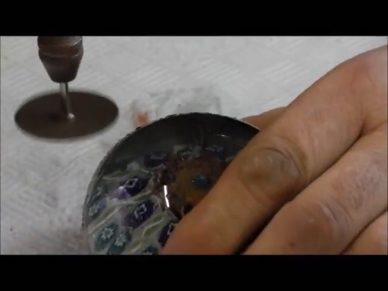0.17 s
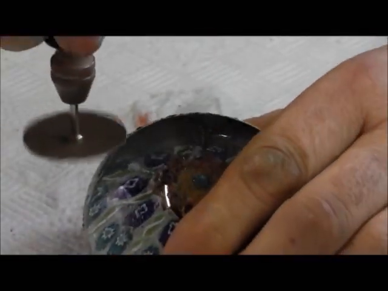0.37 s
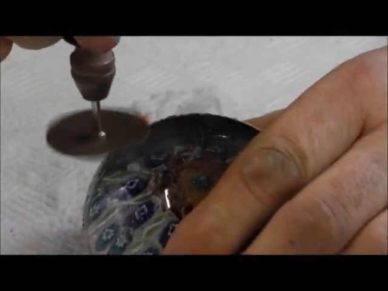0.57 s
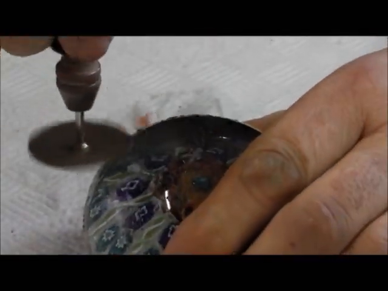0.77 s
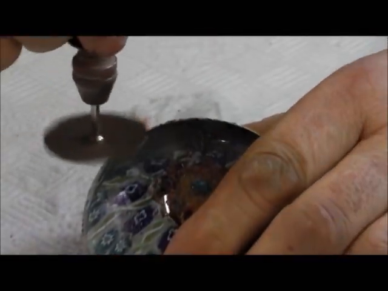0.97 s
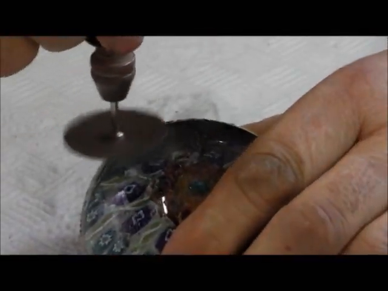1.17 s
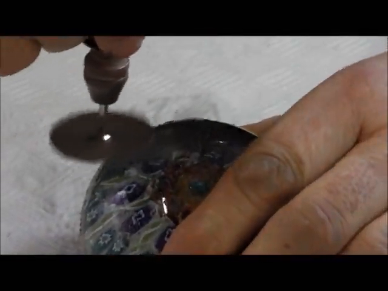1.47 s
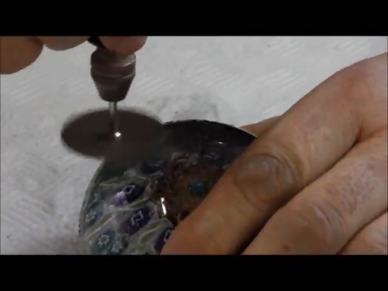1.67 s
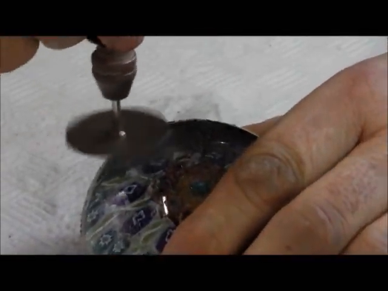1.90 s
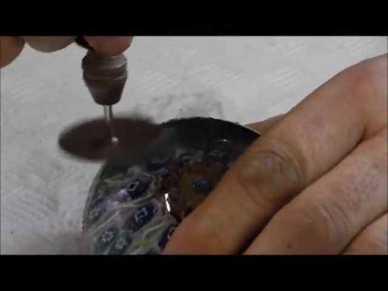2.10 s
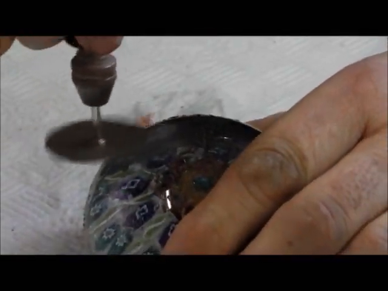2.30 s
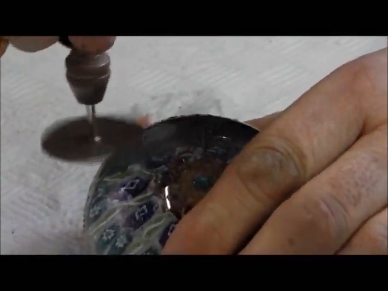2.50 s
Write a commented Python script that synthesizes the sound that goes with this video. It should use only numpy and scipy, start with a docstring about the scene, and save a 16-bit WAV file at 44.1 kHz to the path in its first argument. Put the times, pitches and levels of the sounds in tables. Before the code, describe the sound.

A small rotary tool grinds wet glass. It spins freely for a moment with a thin whine and hiss, then the disc bites in short, rasping, buzzing strokes as the motor slows. Heard close up in a small room.

```python
"""An abrasive disc, spun by a small rotary tool, grinds a wet, hand-held glass dome in short strokes.
The motor runs free at first, with a thin whine, hiss and mains hum, then slows and growls under load.
The disc's high spot knocks once a turn and rebounds, and grit scrapes in between: these impacts
excite the resonant modes of disc and glass. Wet slurry fizzes off the rim,
and the workbench and a small room add short reflections."""
import sys
import numpy as np
from scipy import signal
from scipy.fft import rfft, irfft, next_fast_len
from scipy.io import wavfile

SR = 44100
rng = np.random.default_rng(int(sys.argv[2]) if len(sys.argv) > 2 else 0)


def file_out(sig):
    """Save sig as 16-bit WAV at sys.argv[1]."""
    # one column per channel
    cols = np.atleast_2d(sig).T
    # limit, then scale
    lim = np.clip(cols, -1, 1)
    pcm = np.round(lim * 32767).astype(np.int16)
    wavfile.write(sys.argv[1], SR, pcm)


N = 116865
T = np.arange(N) / SR
FFT_SIZE = next_fast_len(N + SR // 2)
HZ = np.maximum(np.arange(FFT_SIZE // 2 + 1) * SR / FFT_SIZE, 1)


def from_db(db):
    """Amplitude ratio of a level in decibels."""
    return 10 ** (np.asarray(db) / 20)


def unit_rms(x):
    """Normalisation to rms 1."""
    return x / np.sqrt(np.mean(x ** 2) + 1e-20)


def over_time(rows):
    """Linear interpolation in time."""
    return np.interp(T, *np.transpose(rows))


def over_hz(rows, column=1):
    """Interpolation in log frequency."""
    rows = np.array(rows)
    return np.interp(np.log(HZ), np.log(rows[:, 0]), rows[:, column])


def filtered(x, response):
    """Convolution as a product of spectra."""
    return irfft(rfft(x, FFT_SIZE) * response, FFT_SIZE)[..., :N]


def minimum_phase(db):
    """Causal response of a dB curve, by folding the cepstrum."""
    cepstrum = irfft(np.log(from_db(db)), FFT_SIZE)
    cepstrum[1:FFT_SIZE // 2] *= 2
    cepstrum[FFT_SIZE // 2 + 1:] = 0
    return np.exp(rfft(cepstrum))


def resonance_db(hz, width_hz, boost_db):
    """Lorentzian peak of a damped resonator."""
    return 10 * np.log10(1 + (from_db(boost_db) ** 2 - 1) / (1 + (2 * (HZ - hz) / width_hz) ** 2))


def drift(rate_hz):
    """Slow fluctuation: low-passed noise of rms 1."""
    return unit_rms(filtered(rng.standard_normal(FFT_SIZE), 1 / (1 + (HZ / rate_hz) ** 2)))


def harmonic(order, cycles):
    """Sinusoid at a multiple of a fundamental, in random phase."""
    return np.sin(2 * np.pi * (order * cycles + rng.random()))


def panned(balance):
    """Left and right gains from a level difference at each frequency."""
    return from_db(np.array([[.5], [-.5]]) * over_hz(balance))


# Likeness of left and right: frequency_hz, correlation
CORRELATION = [(60, -0.6), (300, 0.37), (2200, 0.74), (4500, 0.08), (8000, -0.54), (15000, -0.16)]

def stereo_noise(db):
    """Partly coherent noise of rms 1: the ratio of mid to side sets the correlation."""
    alike = np.clip(over_hz(CORRELATION), -.99, .99)
    mid, side = filtered(rng.standard_normal((2, N)), from_db(db) * np.sqrt([1 + alike, 1 - alike]))
    return unit_rms(np.array([mid + side, mid - side]))


# Spindle speed: time_s, turns_per_s
SPEED = [(0, 122), (.04, 125.3), (.425, 124), (.5, 121.5), (.545, 124), (.61, 115.5), (.655, 116.6),
         (.74, 116), (.86, 112.6), (1.02, 106.4), (1.21, 103.3), (1.3, 115), (1.41, 103), (1.52, 112.4),
         (1.67, 106.3), (1.84, 111.5), (1.95, 117.4), (2.07, 111), (2.25, 103.4), (2.35, 114.5),
         (2.49, 114), (2.65, 109.5)]

def spindle_turns():
    """Rotation is the integral of a slightly wobbling speed."""
    return np.cumsum(over_time(SPEED) * (1 + .0008 * drift(15))) / SR


# Motor whine: speed_multiple, level_db
WHINE = [(8, -53), (18, -36), (24, -49), (32, -48), (40, -48.5), (72, -48)]
# Motor hum: mains_multiple, level_db
HUM = [(2, -69), (4, -65.5), (6, -66.5), (8, -57), (10, -52.5)]
# Rush of fan and brushes: frequency_hz, relative_db
HISS = [(25, -0.5), (100, -3), (320, -8.5), (430, -2), (620, -2.5), (1200, -2), (1500, 4.5), (1850, 2.5),
        (2700, 5.5), (3400, 2.5), (4100, 5), (5500, 1.5), (7000, 1), (9200, 3), (11500, -2.5), (15500, -9)]
# Housing resonances: frequency_hz, width_hz, boost_db
HOUSING = [(2230, 72, 3), (9180, 97, -1.5)]
# Motor's stereo balance: frequency_hz, left_over_right_db
MOTOR_BALANCE = [(60, -2.5), (400, 4), (2500, 4), (4200, 5), (7000, 4), (12000, -1)]
MAINS_HZ, HISS_DB = 50.05, -30.5
LOAD_START_S, LOAD_RISE_S, WHINE_LOADED_DB, HISS_LOADED_DB = .443, .045, -5.5, -2

def motor(turns):
    """Harmonics of rotation whine and those of the mains hum; the mains modulates whine and hiss."""
    loaded = np.clip((T - LOAD_START_S) / LOAD_RISE_S, 0, 1)
    mains_phase = 2 * np.pi * MAINS_HZ * T
    whine = sum(from_db(db) * harmonic(order, turns) for order, db in WHINE)
    whine *= from_db(WHINE_LOADED_DB * loaded) * (1 + .24 * np.sin(mains_phase))
    hum = sum(from_db(db) * harmonic(order, MAINS_HZ * T) for order, db in HUM)
    hiss = stereo_noise(over_hz(HISS) + sum(resonance_db(*row) for row in HOUSING))
    hiss *= from_db(HISS_DB + HISS_LOADED_DB * loaded) * (1 + .18 * np.sin(2 * mains_phase))
    return filtered(hiss + np.sqrt(2) * (whine + hum), panned(MOTOR_BALANCE))


# The disc is pressed on: start_s, rise_s, hold_s, level_db
STROKES = [(0.443, .045, 0.022, -22), (0.588, 0.013, 0.017, -24.5), (0.706, 0.036, .15, -21),
           (0.916, 0.019, 0.041, -21.5), (1.044, 0.015, 0.059, -19), (1.122, 0.017, 0.03, -18),
           (1.277, 0.027, .12, -19), (1.528, 0.031, 0.11, -18), (1.801, 0.032, 0.099, -18.5),
           (2.063, 0.017, 0.064, -18), (2.228, 0.038, 0.069, -19.5), (2.462, 0.056, 0.052, -18)]
# Light rubbing between strokes: time_s, level_db
RUB = [(.41, -61), (.45, -20), (.6, -21.5), (.69, -21.5), (1.0, -24), (1.24, -26), (1.5, -24.5),
       (1.72, -24.5), (1.79, -29.5), (2.04, -28), (2.21, -31), (2.4, -27.5), (2.46, -33.5), (2.65, -27.5)]

def contact_force(release_s=.025):
    """Normal force on the glass: strokes rise, hold and decay exponentially over light rubbing."""
    strokes = []
    for start, rise, hold, db in STROKES:
        attack = np.clip((T - start) / rise, 0, 1)
        release = np.exp(-np.maximum(T - start - rise - hold, 0) / release_s)
        strokes.append(from_db(db) * attack * release)
    return np.hypot(np.max(strokes, axis=0), from_db(over_time(RUB)))


def impulses(times, sizes):
    """Ideal impacts, one sample long."""
    return np.bincount(np.clip(times * SR, 0, N).astype(int), sizes, N + 1)[:N]


# The disc bites and bounces on the glass: start_s, length_s, level_db, unevenness_share
BITES = [(0.427, 0.05, -25.5, 0.27), (0.463, 0.079, -19.5, 0.08), (0.547, 0.091, -21, 0),
         (0.743, 0.052, -23.5, 0.62), (0.813, 0.081, -22, 0.21), (1.061, 0.048, -19, .5),
         (1.138, 0.034, -21.5, 0.69), (1.296, 0.067, -19.5, 0.52), (1.397, 0.03, -25.5, 0.68),
         (1.54, 0.035, -20.5, 0.79), (1.617, 0.056, -20, 0.5), (1.827, .11, -22, 0.6),
         (2.068, 0.076, -20, 0.58), (2.313, 0.042, -17.5, 0.02), (2.515, 0.058, -19.5, 0.65)]
KNOCK_DB, KNOCK_JITTER_S, BITE_RELEASE_S = -7, .0003, .012
REBOUND_TURNS, REBOUND_DB, REBOUND_JITTER_S = .48, -5.5, .00099

def knocks(turns, force):
    """Periodic impact: the high spot strikes once a turn and rebounds, harder while the disc bites."""
    turn_numbers = np.arange(1, int(turns[-1]))
    count = len(turn_numbers)
    times = np.interp(turn_numbers, turns, T)
    rebound_times = np.interp(turn_numbers + REBOUND_TURNS, turns, T)
    size = from_db(KNOCK_DB) * np.interp(times, T, force)
    uneven = np.ones(count)
    for start, length, db, unevenness in BITES:
        release = np.exp(-np.maximum(times - start - length, 0) / BITE_RELEASE_S)
        bite = from_db(db) * (times > start) * release
        uneven = np.where(bite > size, unevenness, uneven)
        size = np.maximum(bite, size)
    jitter, scatter_db, rebound_jitter, rebound_scatter_db = uneven * rng.standard_normal((count, 4)).T
    strikes = impulses(times + KNOCK_JITTER_S * jitter, size * from_db(scatter_db))
    rebounds = impulses(rebound_times + REBOUND_JITTER_S * rebound_jitter,
                        size * from_db(REBOUND_DB + rebound_scatter_db))
    return (strikes + rebounds) * np.sqrt(N / count)


def grit(turns, grains_per_s=7000):
    """Shot noise: abrasive grains chip the glass, hardest just after the high spot strikes."""
    grain_db = np.minimum(rng.exponential(1, N), 4)
    sizes = from_db(grain_db) * rng.choice([-1, 1], N)
    hits = rng.random(N) < grains_per_s / SR
    return unit_rms(sizes * hits * np.exp(-.5 * (turns % 1)))


# The contact slides from the dome's edge up its side: time_s, side_share
SLIDE = [(.6, 0.32), (.85, 0.36), (1.08, 0.93)]
# Modes of disc and glass: pitch_hz, width_hz, edge_boost_db, side_boost_db
MODES = [(705, 27, 14, 8), (1372, 18.15, 6.5, 12.5), (1550, 37, -3, 12.5), (1640, 7.3, 18.5, 14),
         (1846, 15, 11, 10.5), (1930, 40, 13, 9.5), (2024, 40, 13.5, -1), (2182, 69, 4.5, 13.5),
         (2303, 39, 8, 5), (2510, 38, 8, 11), (2687, 25, 1, 7), (2788, 47, 8.5, 3), (4058, 56, 0, 9),
         (4143, 93, 5.5, 6), (4398, 75, 9.5, 5), (4564, 105, 13.5, 2.5), (5180, 25, 8, 9)]
# Broad spectrum of the contact: frequency_hz, edge_db, side_db
CONTACT_COLOUR = [(150, -29.5, -44.5), (354, -17, -29.5), (476, -25, -25.5), (1080, -12, -13),
                  (1392, -6.5, -4.5), (2130, -2.5, -4), (2820, 4, -2), (3330, 2, 1), (4260, 0, 1),
                  (5130, -7.5, -3), (6770, -15, -9), (8550, -11, -17.5), (10340, -3.5, -14),
                  (12100, -17, -20.5), (15500, -25, -30)]
WET_CUTOFF_HZ, GRIT_DB = 7000, -1.5
BEND_DELAY_S, BEND_REFERENCE_HZ = .0013, 3000  # travel time in the disc at this frequency

def grinding(turns, force):
    """Dispersion: impacts travel as bending waves, treble first, and ring modes set by the contact."""
    wet_lowpass = 1 / np.sqrt(1 + (HZ / WET_CUTOFF_HZ) ** 4)
    drive = filtered(knocks(turns, force), wet_lowpass) + from_db(GRIT_DB) * force * grit(turns)
    dispersion = np.exp(-4j * np.pi * BEND_DELAY_S * np.sqrt(BEND_REFERENCE_HZ * HZ))
    side_share = over_time(SLIDE)
    ringing = 0
    for place, share in enumerate((1 - side_share, side_share)):
        modes_db = sum(resonance_db(hz, width, boosts[place]) for hz, width, *boosts in MODES)
        body = minimum_phase(over_hz(CONTACT_COLOUR, column=place + 1) + modes_db)
        body /= np.sqrt(np.mean(abs(body) ** 2))
        ringing += filtered(drive * share, dispersion * body)
    return ringing


def reflections(db, t60_s, delay_s):
    """Response of a diffuse field: echoes decay exponentially, independently in each channel."""
    echoes = rng.standard_normal((2, N)) * from_db(-60 * T / t60_s) * (T > delay_s)
    return from_db(db) * rfft(unit_rms(echoes) / np.sqrt(N), FFT_SIZE)


# Stereo balance of grinding and growl: frequency_hz, left_over_right_db
CONTACT_BALANCE = [(60, 6), (250, 4.5), (1200, 3.5), (2500, 3), (4500, 1.5), (7000, 3.5), (9000, 1.5),
                   (13000, -15)]

def workshop(x, left_lag_s=.000022):
    """Multipath propagation: direct sound, early echoes from bench and hands, then the room."""
    direct = np.exp(-2j * np.pi * HZ * np.array([[left_lag_s], [0]]))
    bench = reflections(db=-14, t60_s=.045, delay_s=.0003)
    room = reflections(db=-6, t60_s=.15, delay_s=.004)
    return filtered(x, (direct + bench + room) * panned(CONTACT_BALANCE))


# Fizz of wet slurry: frequency_hz, relative_db
SPRAY = [(2000, -45), (5000, 8.5), (7000, 4.5), (10300, -3), (12000, -4.5), (13500, -0.5), (15500, -2.5)]
SPRAY_DB, FIRM_FORCE_DB = -25.5, -15.5

def spray(turns, force, flicker_db=1.5):
    """Modulated noise: slurry leaves the rim in one spurt a turn, growing as a power of the force."""
    spurts = unit_rms(np.exp(-.56 * (turns % 1)) * from_db(flicker_db * drift(10)))
    strength = from_db(SPRAY_DB) * (force / from_db(FIRM_FORCE_DB)) ** .47
    return strength * spurts * stereo_noise(over_hz(SPRAY))


# Growl of the loaded spindle: time_s, level_db
GROWL = [(.42, -72), (.52, -44), (.62, -43), (.85, -42.5), (1.04, -43), (1.2, -48.5), (1.45, -47),
         (1.75, -50), (2.0, -48), (2.3, -56), (2.65, -52)]
# Its tones: speed_multiple, relative_db
GROWL_TONES = [(2, -18), (4, -9.5), (5, -12), (7, -12), (8, -1.5)]
# Its rumble: frequency_hz, relative_db
RUMBLE = [(60, -5), (200, -7), (400, -4), (900, 1), (1500, -14), (4000, -30)]
# Resonances of the rumble: frequency_hz, width_hz, boost_db
RUMBLE_PEAKS = [(414, 41, 7.3), (698, 18, 15.6), (934, 42, 9.9)]

def growl(turns, flicker_db=4.5, rumble_db=.5):
    """Forced vibration: unsteady low harmonics follow the loaded spindle, over a resonant rumble."""
    tones = 0
    for order, db in GROWL_TONES:
        flicker = from_db(flicker_db * drift(25))
        tones += from_db(db) * unit_rms(flicker * harmonic(order, turns))
    rumble = stereo_noise(over_hz(RUMBLE) + sum(resonance_db(*row) for row in RUMBLE_PEAKS))
    vibration = from_db(over_time(GROWL)) * (tones + from_db(rumble_db) * rumble)
    return filtered(vibration, panned(CONTACT_BALANCE))


def gain_control(x, target_db=-20, db_per_db=.17, time_s=.023):
    """Compression: the gain falls a little as the smoothed power rises."""
    power = np.mean(x ** 2, axis=0)
    pole = np.exp(-1 / (time_s * SR))
    smoothed, _ = signal.lfilter([1 - pole], [1, -pole], power, zi=[power[:SR // 10].mean()])
    return x * from_db(-db_per_db * (10 * np.log10(smoothed) - target_db))


def scene():
    """Superposition of four sources driven by one spindle."""
    turns = spindle_turns()
    force = contact_force()
    return motor(turns) + workshop(grinding(turns, force)) + spray(turns, force) + growl(turns)


NOTCH_HZ, NOTCH_WIDTH_HZ, CUTOFF_HZ = 7850, 650, 15850

def record(dry):
    """Compression and soft saturation round the peaks; a treble notch and a steep low-pass follow."""
    rounded = np.tanh(gain_control(dry))
    notch = signal.iirnotch(NOTCH_HZ, NOTCH_HZ / NOTCH_WIDTH_HZ, fs=SR)
    notched = signal.lfilter(*notch, signal.lfilter(*notch, rounded))
    lowpass = signal.ellip(12, .1, 80, CUTOFF_HZ, fs=SR, output="sos")
    return signal.sosfilt(lowpass, notched)


dry = scene()
out = record(dry)
file_out(out)
```